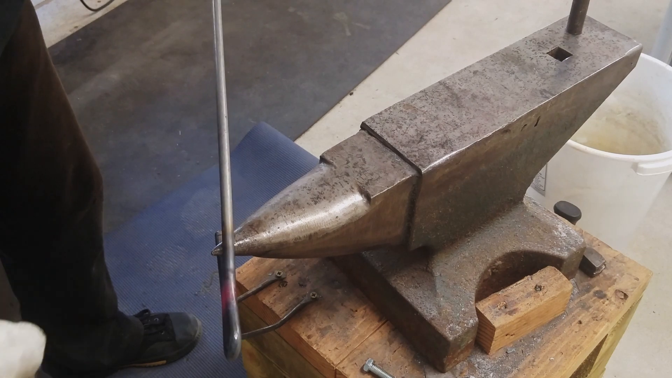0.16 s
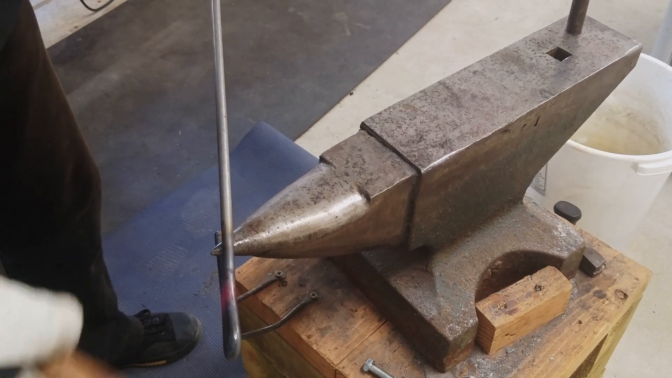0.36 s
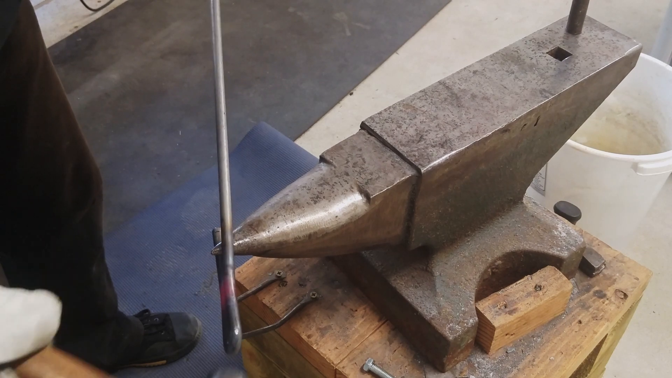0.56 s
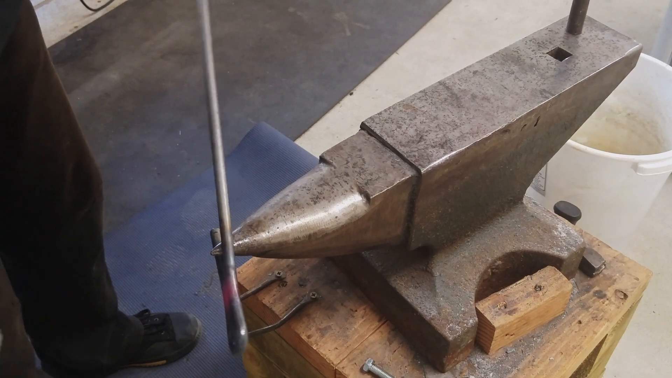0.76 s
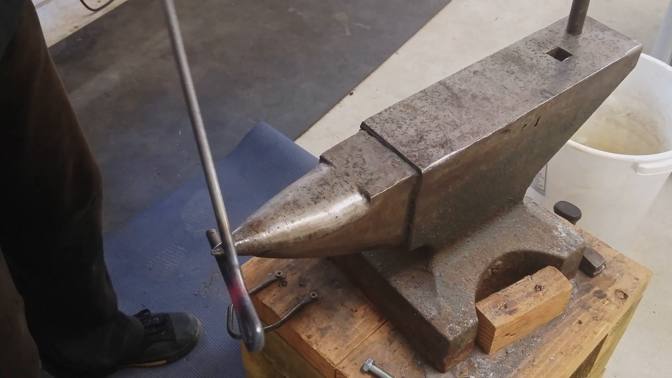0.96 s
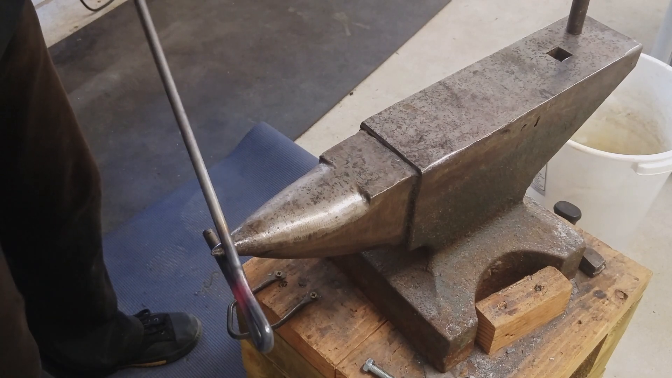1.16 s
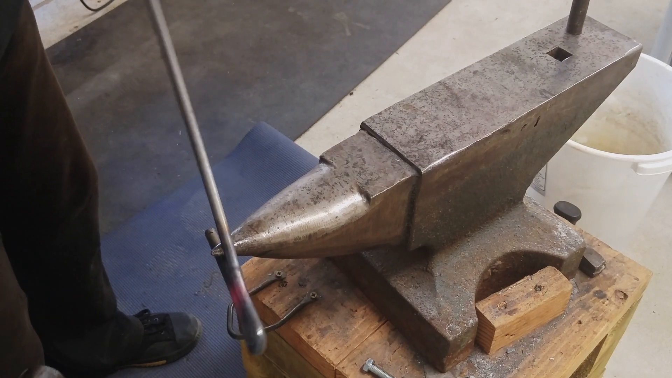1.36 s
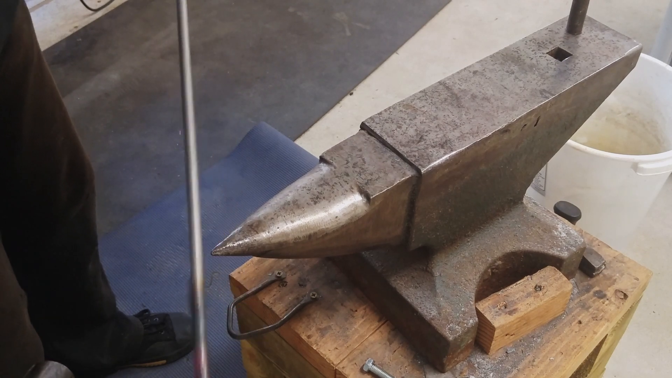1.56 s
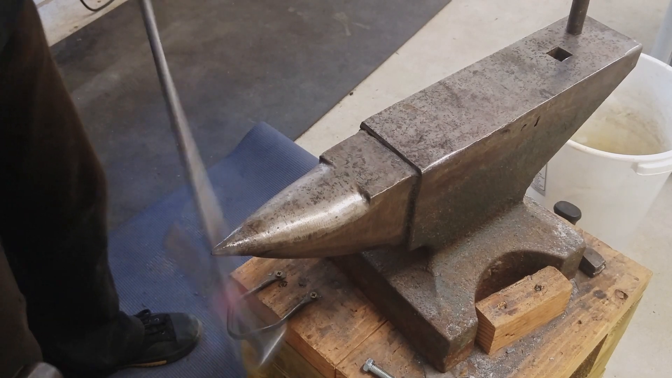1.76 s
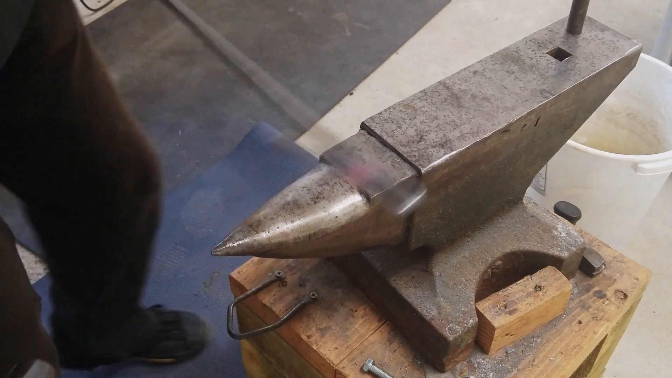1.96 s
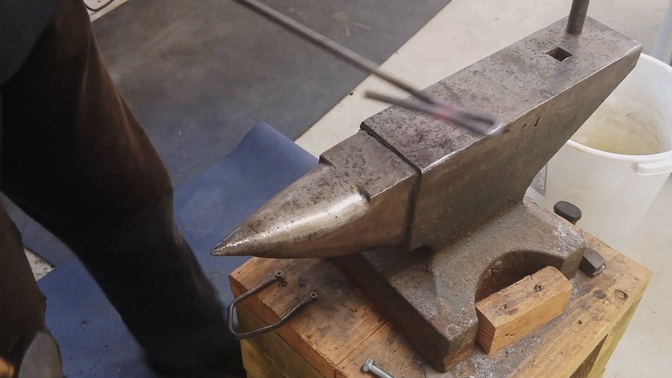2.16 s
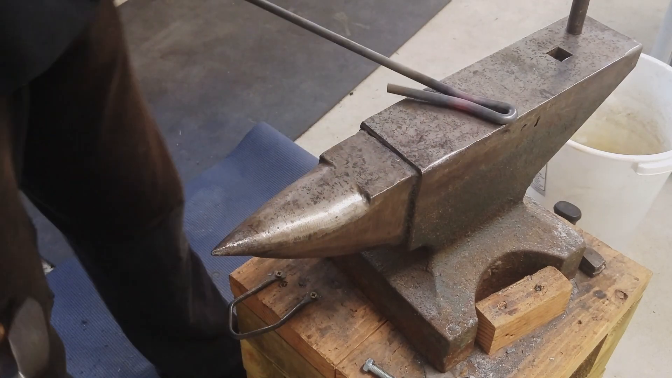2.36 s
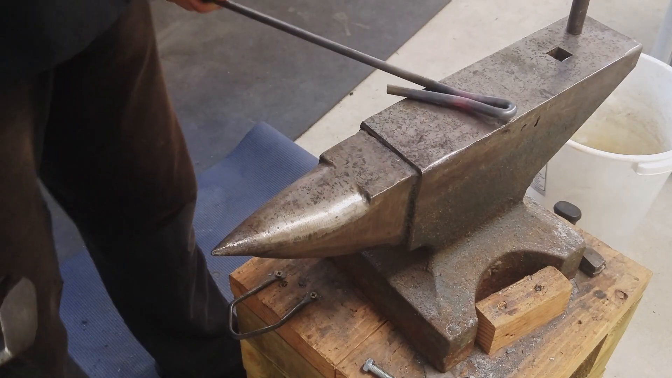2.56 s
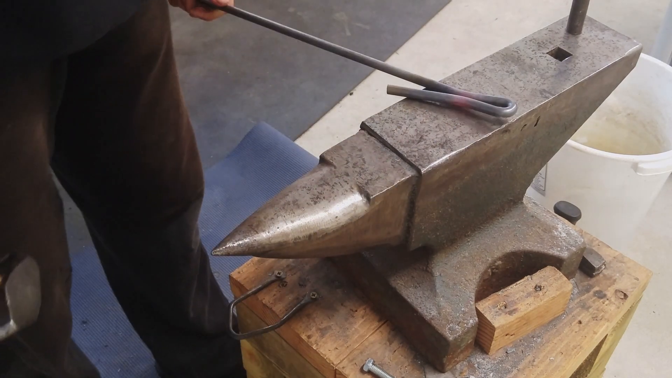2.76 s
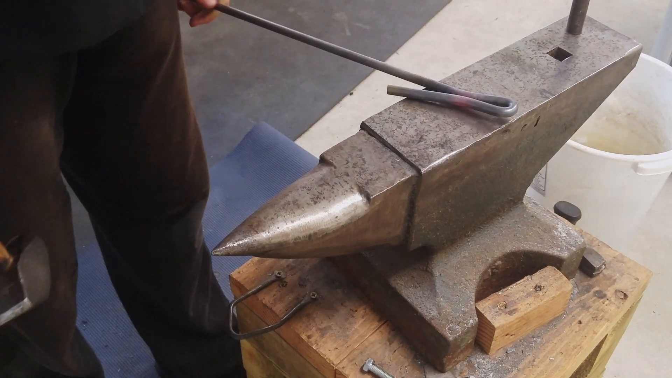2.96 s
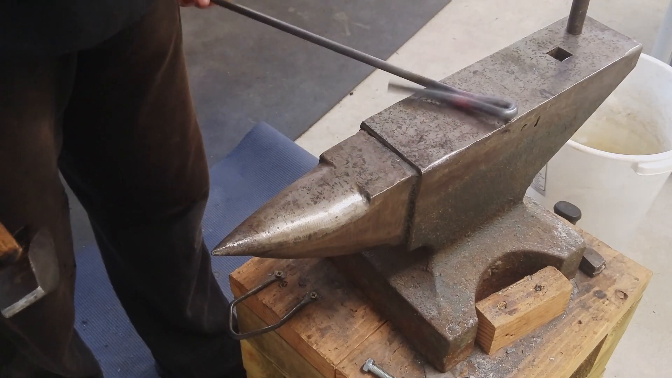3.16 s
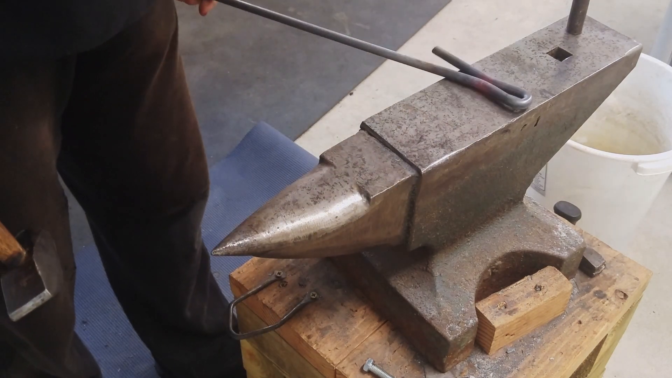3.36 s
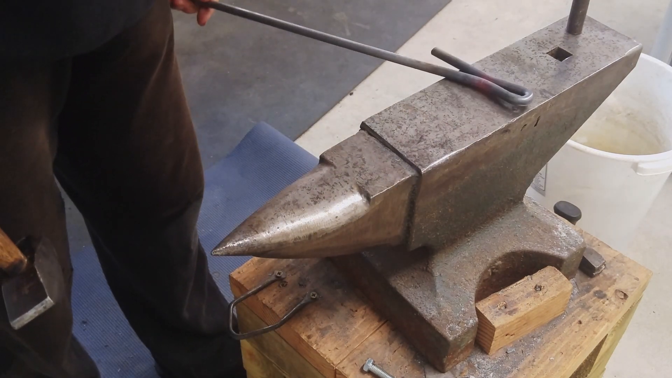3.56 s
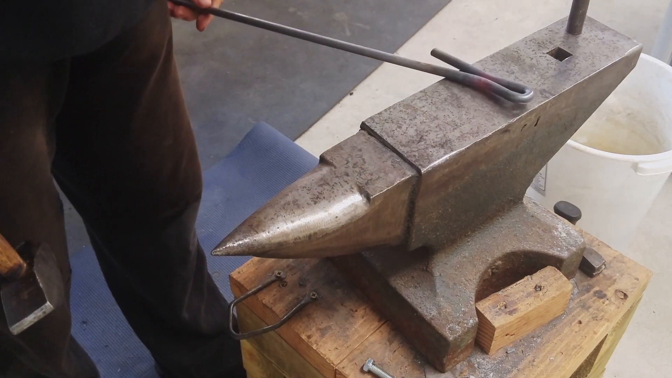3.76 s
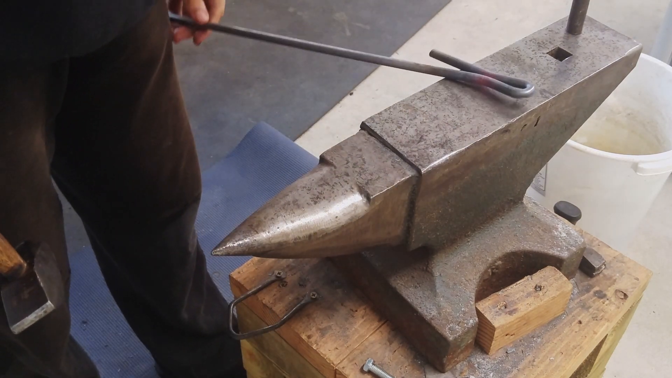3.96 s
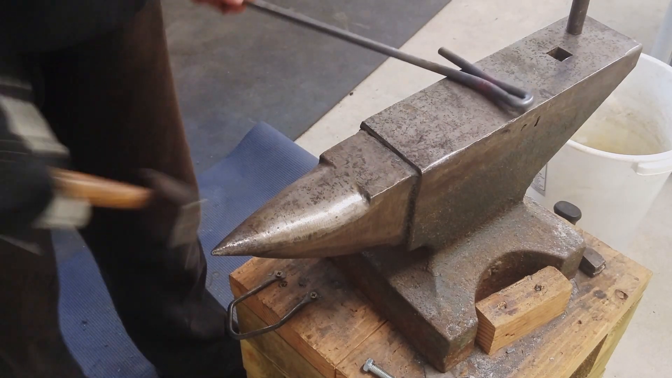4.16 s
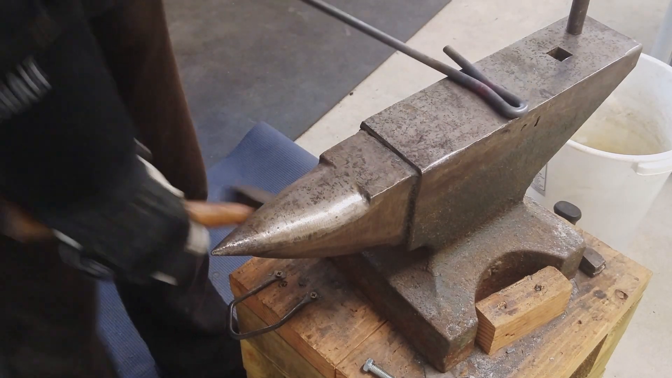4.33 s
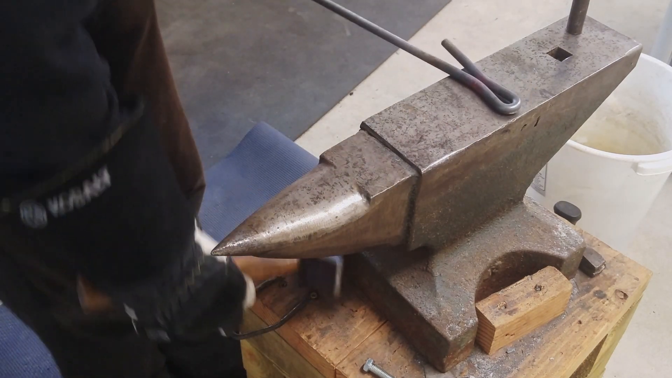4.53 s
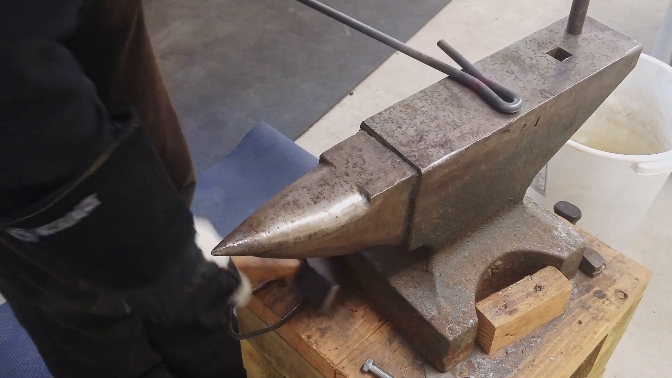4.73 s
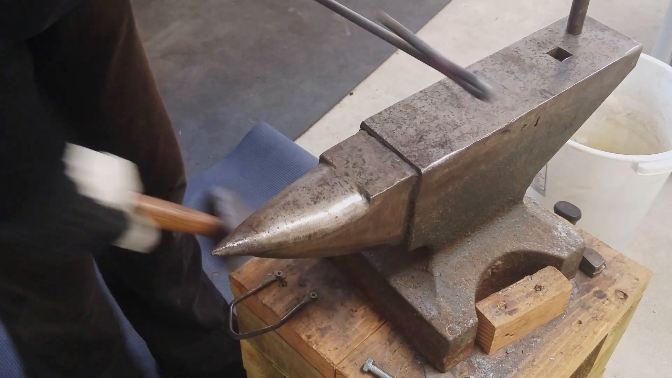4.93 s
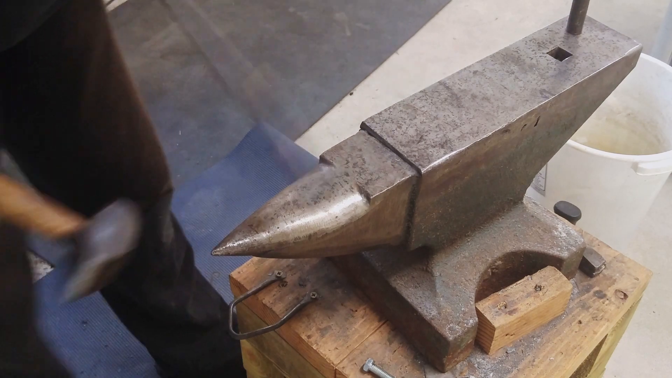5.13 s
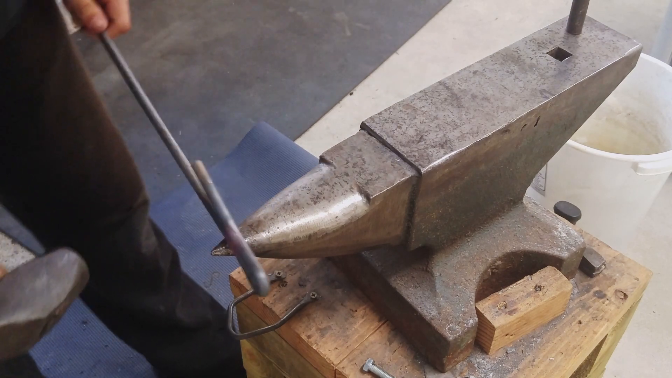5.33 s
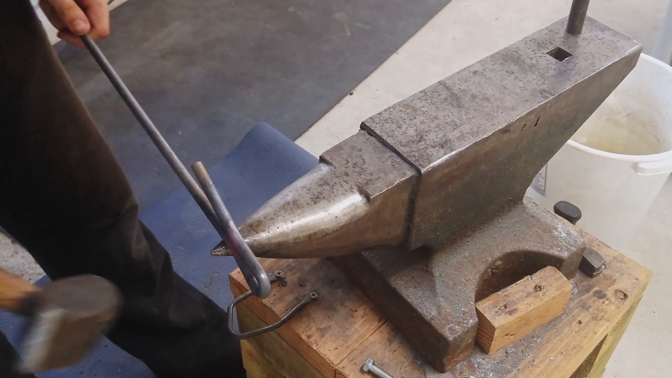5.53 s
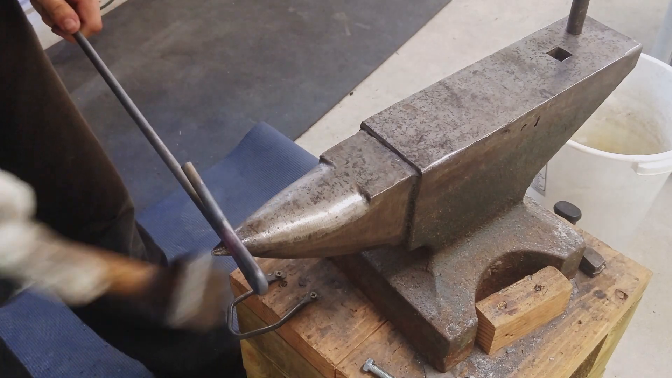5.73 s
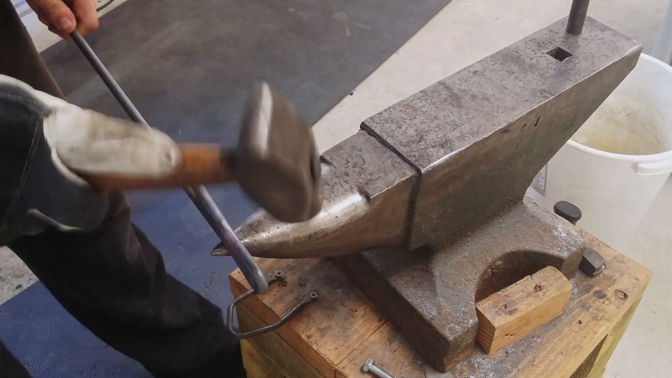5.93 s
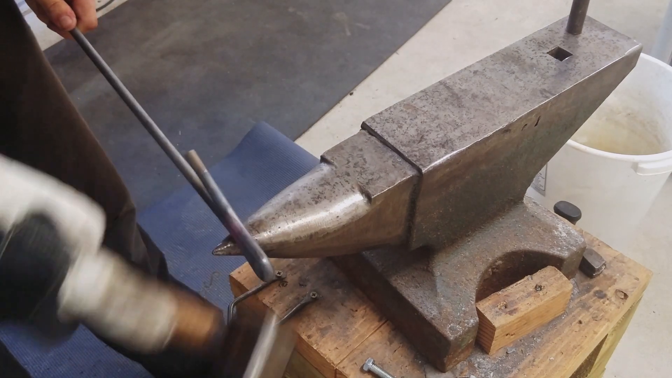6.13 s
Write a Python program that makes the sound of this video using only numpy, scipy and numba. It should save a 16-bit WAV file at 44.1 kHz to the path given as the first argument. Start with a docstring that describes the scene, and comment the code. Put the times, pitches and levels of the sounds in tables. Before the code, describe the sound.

A smith strikes, drags and drops a steel rod on a ringing anvil, with dry wooden knocks, a faint distant hiss and room echo.

```python
"""The ring of a blow struck just before the start, then more hammering as a smith bends a steel rod on an anvil.
Blows and landings are struck modes with close, beating twins, plus noise bursts for the clash of contact.
The rod drags over the horn by stick and slip, drops and bounces; steel knocks on the wooden stand.
Clothes and shoes brush, a hiss swells with a climbing whistle, ventilation and a machine hum lie behind.
A hard-walled workshop reverberates; the close microphone ducks at each blow, so the room swells up behind it."""
import sys
import numpy as np
from scipy import signal
from scipy.fft import rfft, irfft, next_fast_len
from scipy.io import wavfile
from scipy.ndimage import uniform_filter1d, minimum_filter1d
from numba import njit

SR = 44100
rng = np.random.default_rng(int(sys.argv[2]) if len(sys.argv) > 2 else 0)


def wav_out(sig):
    """Save sig, one row per channel (or a flat mono array), as 16-bit PCM at SR to the path in sys.argv[1]."""
    wavfile.write(sys.argv[1], SR, np.round(np.clip(np.atleast_2d(sig).T, -1, 1) * 32767).astype(np.int16))


N = 272968
# synthesis starts a quarter second early, so that earlier sounds are already ringing at time 0
LEAD = SR // 4
TIME = (np.arange(N + LEAD) - LEAD) / SR
AGE = np.arange(SR) / SR  # time since a hit [s]


def from_db(db):
    """Logarithmic level: decibels to amplitude gain."""
    return 10 ** (np.asarray(db) / 20)


def unit(x):
    """Mean power: scale to rms 1."""
    return x / np.sqrt(np.mean(x ** 2))


def burst(x):
    """Total energy: scale a hit to the energy of 10 ms at rms 1."""
    return x / np.sqrt(np.sum(x ** 2) / (SR / 100))


def fade(t, t60):
    """Exponential damping: 60 dB down at t60."""
    return np.exp(-np.log(1000) * t / t60)


def swell(start_s, attack_s, hold_s, release_t60, db):
    """Amplitude envelope: gain that rises evenly, holds and dies away."""
    age = TIME - start_s
    release = fade(np.maximum(age - attack_s - hold_s, 0), release_t60)
    return from_db(db) * np.clip(age / attack_s, 0, 1) * release


def colour(x, spectrum):
    """Minimum-phase filtering: shape by (frequency [Hz], relative level [dB]) points, without pre-ringing."""
    hz, db = np.transpose(spectrum)
    size = 2 * next_fast_len(len(x))
    f = np.maximum(np.fft.rfftfreq(size, 1 / SR), 1)
    cepstrum = irfft(np.log(from_db(np.interp(np.log(f), np.log(hz), db))))
    # keeping only the causal half of the cepstrum gives the minimum phase
    response = np.exp(2 * rfft(cepstrum[:size // 2], size))
    return irfft(rfft(x, size) * response)[:len(x)]


def noise(spectrum):
    """Stationary random signal: coloured noise at rms 1."""
    return unit(colour(rng.standard_normal(len(TIME)), spectrum))


def resonate(x, hz, width):
    """Simple resonator: one peak of the given width [Hz], gain 1 at its centre."""
    return signal.lfilter(*signal.iirpeak(hz, hz / width, fs=SR), x)


def ring(hz, db, t60, tilt_db=0, split=0.00463, twin_db=-5):
    """Modal synthesis: harder contact is brighter; uneven steel gives each mode a close twin that beats with it."""
    t = AGE[:SR // 2]
    chance = rng.uniform(-1, 1, (len(hz), 2))
    gain = from_db(db + tilt_db * np.log2(hz / 4000)) * np.sign(chance[:, 0])  # random polarity
    phase = (2 * np.pi * np.outer(hz, t)).astype(np.float32)
    # the twin lies above or below by 0.5 to 1.5 times the split
    gap = split * (chance[:, 1:] + .5 * np.sign(chance[:, 1:]))
    twin = np.sin(phase * (1 + gap).astype(np.float32))
    pair = np.sin(phase) + from_db(twin_db) * twin
    modes = gain @ (pair * fade(t, t60[:, None]))
    return np.pad(burst(modes), (0, SR - len(t)))


def crash(spectrum, t60, tilt_db=0, snap=0.22):
    """High modal density: a snap at first contact, then countless short modes heard as a dying noise burst."""
    rattle = rng.standard_normal(SR) * fade(AGE, t60)
    rattle[0] = snap * np.sqrt(np.sum(rattle ** 2))
    tilted = [(hz, db + tilt_db * np.log2(hz / 4000)) for hz, db in spectrum]
    return burst(colour(rattle, tilted))


def add(track, s, sound):
    """Superposition: mix a sound in at time s."""
    start = max(int(s * SR) + LEAD, 0)
    part = sound[:max(len(track) - start, 0)]
    track[start:start + len(part)] += part


# anvil modes: (frequency [Hz], relative level [dB], t60 [s])
ANVIL_MODES = [(1100, -16.0, 0.24), (1445, -6.0, 0.24), (1950, -13.0, 0.24), (2169, -1.0, 0.24),
               (2384, -10.0, 0.24), (2573, -8.0, 0.24), (3187, -2.0, 0.24), (4064, -3.0, 0.36),
               (4447, -5.0, 0.24), (4503, -4.0, 0.36), (5000, 0.0, 0.36), (5264, -6.0, 0.24),
               (5545, -15.0, 0.24), (6223, -4.0, 0.24), (6880, -14.0, 0.24), (7601, -9.0, 0.24),
               (8605, -19.0, 0.2), (9436, -31.0, 0.2), (9813, -32.0, 0.2), (10160, -31.0, 0.2),
               (11550, -35.0, 0.2), (13070, -40.0, 0.2), (14292, -38.0, 0.2)]
# spectrum of the clash of steel on steel: (frequency [Hz], relative level [dB])
CLASH_SPECTRUM = [(250, -27.5), (500, -26.5), (1000, -9.5), (1800, -10.5), (2100, -6), (2900, -9.5),
                  (3600, -8.5), (5200, -4), (6400, -11), (8000, -24), (11000, -30.5), (15500, -39)]
# modes of hammer, rod and horn pressed together:
# (frequency [Hz], relative level struck at the bend [dB], relative level struck along the leg [dB], t60 [s])
HAMMER_MODES = [(936, -27, -22, 0.2), (1352, -37, -11.5, 0.13), (1962, -31.5, -10.5, 0.42),
                (2068, 9, -11, 0.076), (2170, -11, -15, 0.028), (2539, -9, 2.5, 0.12),
                (3527, -22.5, -20, 0.33), (3990, -5, -10, 0.16), (4500, -15, -22, 0.15),
                (5045, 2, -15, 0.11), (5400, -11.5, -35, 0.089), (5170, -15, -26.5, 0.14),
                (5740, -19, -21, 0.14), (6150, -21.5, -18.5, 0.047), (6300, -24.5, 0, 0.085),
                (6150, -0.5, -37, 0.123), (7320, -26, -4.5, 0.068), (8720, -47, -16, 0.124),
                (8800, -35.5, -37.5, 0.14), (10100, -20.5, -22.5, 0.12), (12000, -47, -15.5, 0.088)]
# hammer blows: (time [s], hammer level [dB], anvil level [dB], clash level [dB], jolt of the stand [dB],
# place from bend to leg [0-1], tilt [dB per octave])
HAMMER_BLOWS = [(-.08, -2, -12.5, -1.5, -31, 0.1, 3), (0.474, -3.5, -20, -5, -27, 0.34, 0.9),
                (6.0945, -1, -8, -2, -11, 0.97, 0.5)]


def hammer_blows():
    """Impact excitation: the hammer drives the rod onto the horn, with a clash, and both masses ring."""
    out = np.zeros(len(TIME))
    hz, bend_db, leg_db, t60 = np.transpose(HAMMER_MODES)
    for s, hammer_db, anvil_db, clash_db, _, along, tilt_db in HAMMER_BLOWS:
        mode_db = bend_db + np.clip(along, 0, 1) * (leg_db - bend_db)
        hammer = ring(hz, mode_db, t60, tilt_db)
        anvil = ring(*np.transpose(ANVIL_MODES), tilt_db)
        clash = crash(CLASH_SPECTRUM, t60=.06, tilt_db=tilt_db, snap=.1)
        clash = clash + from_db(-10) * crash(CLASH_SPECTRUM, t60=.01, tilt_db=4, snap=.1)  # sharp edge
        add(out, s, from_db(hammer_db) * hammer + from_db(anvil_db) * anvil + from_db(clash_db) * clash)
    return out


REBOUND = .71  # each flight as a share of the one before


def bounces(s, flight_s, loss_db, count=4):
    """Inelastic rebound: contacts (number, time, gain) with ever shorter flights, ever weaker."""
    for k in range(count):
        if k * loss_db < 18:  # weaker contacts are left out
            yield k, s, from_db(-k * loss_db)
        s = s + flight_s * REBOUND ** k


# modes of the bent rod against the anvil:
# (frequency [Hz], relative level landing flat [dB], relative level landing on edge [dB], t60 [s])
ROD_MODES = [(1193, -37, -32, 0.11), (1690, -37.5, -6, 0.08), (2400, -19, 8.5, 0.039),
             (2558, -25.5, -9.5, 0.71), (3040, -10, -14, 0.091), (3190, 1, -20, 0.031),
             (3500, -6, -38, 0.1), (4016, 1, -5, 0.19), (4080, -13, -12, 0.11), (4440, -2.5, -10, 0.051),
             (4345, -23.5, 2, 0.31), (4950, -12, -17, 0.11), (5084, -7.5, 2, 0.25), (5200, -18, -0.5, 0.12),
             (6180, -17, 11, 0.08), (6245, -8, -3.5, 0.11), (6810, -18, 6, 0.064),
             (7360, -19.5, 9.5, 0.025), (7330, -16, -16, 0.085), (7880, -55, -15, 0.49),
             (8700, -26.5, -10, 0.096), (9480, -55, -33, 0.052), (10270, -29.5, -7.5, 0.05),
             (11600, -30, -9.5, 0.064), (12630, -44, -20, 0.15), (13110, -57, -35, 0.15),
             (13790, -59.5, -12, 0.15), (16500, -65, -45, 0.15)]
# the rod drops on the anvil: (time [s], rod level [dB], anvil level [dB], clash level [dB],
# flat to on edge [0-1], tilt [dB per octave], first flight [s], loss per bounce [dB])
ROD_LANDINGS = [(2.341, -13.5, -57, -23, 0.09, 5.5, .0347, 5), (2.473, -30, -37.5, -47, 0.36, 0.5, .012, 6),
                (3.2582, -22, -28.5, -26.5, 0.42, 6, 0.008, 4.5),
                (3.3859, -17.5, -23, -18, 0.74, 4.5, .0105, 1.1),
                (4.401, -41.5, -54, -64, 0.34, -7, 0.014, 20),
                (5.3419, -18.5, -8.5, -11.5, 0.9, 1.17, 0.041, 6.5)]
# with each bounce the contacts grow duller [dB per octave] and clash less [dB]
BOUNCE_TILT_DB, BOUNCE_CLASH_DB = -2, -7.5


def rod_landings():
    """Position-dependent excitation: the rod rings the anvil and bounces; the side it lands on picks its modes."""
    out = np.zeros(len(TIME))
    hz, flat_db, edge_db, t60 = np.transpose(ROD_MODES)
    for s, rod_db, anvil_db, clash_db, edge, tilt_db, flight_s, loss_db in ROD_LANDINGS:
        add(out, s, from_db(anvil_db) * ring(*np.transpose(ANVIL_MODES), tilt_db))
        mode_db = flat_db + np.clip(edge, 0, 1) * (edge_db - flat_db)
        for k, contact_s, gain in bounces(s, flight_s, loss_db):
            bright_db = tilt_db + k * BOUNCE_TILT_DB
            rod = ring(hz, mode_db, t60, bright_db)
            clash = crash(CLASH_SPECTRUM, t60=0.043, tilt_db=bright_db, snap=0.91)
            clash_gain = from_db(clash_db + k * BOUNCE_CLASH_DB)
            add(out, contact_s, gain * (from_db(rod_db) * rod + clash_gain * clash))
    return out


# modes of the horn under the dragging rod: (frequency [Hz], relative level [dB], t60 [s])
HORN_MODES = [(1476, 1.5, 0.22), (1690, -22, .06), (1900, 3, 0.047), (2164, 2, 0.45), (2570, -2.5, 0.16),
              (4090, -0.5, 0.18), (4520, -4, 0.19), (5050, -2, 0.22), (6250, -9.5, 0.32), (7560, -16, 0.12)]
# the drag bites quickly, holds and slips off
DRAG_AT_S, DRAG_ATTACK_S, DRAG_HOLD_S, DRAG_T60_S, DRAG_DB = 1.497, 0.017, 0.031, .15, -38


def rod_drag(slips_per_s=1200):
    """Stick-slip friction: scale on the rod catches and slips, and the tiny kicks ring the horn."""
    slips = (rng.random(len(TIME)) < slips_per_s / SR) * rng.standard_normal(len(TIME))
    horn = ring(*np.transpose(HORN_MODES)) + from_db(-10.0) * crash(CLASH_SPECTRUM, t60=0.015, tilt_db=-4)
    scrape = unit(signal.fftconvolve(slips, horn)[:len(TIME)])
    return scrape * swell(DRAG_AT_S, DRAG_ATTACK_S, DRAG_HOLD_S, DRAG_T60_S, DRAG_DB)


# spectra of the stand's clack and thud: (frequency [Hz], relative level [dB])
CLACK_SPECTRUM = [(150, -28), (400, -10), (600, 5), (850, 6), (1400, -2.5), (2000, -6.5), (2900, -13),
                  (4500, -22), (6000, -32.5), (8500, -61), (15500, -57)]
THUD_SPECTRUM = [(25, -42), (60, -9), (130, -12.5), (200, -1), (300, -7.5), (420, -6.5), (700, -10),
                 (1500, -62)]
# modes of the stand rocking on the floor: (frequency [Hz], relative level [dB], t60 [s])
STAND_MODES = [(66, -8, .2), (122, -7, .15), (204, 0, .15), (353, -3, .12)]


def stand(clack_db, thud_db, tilt_db, rock_db):
    """Heavily damped body: a dry clack over the thud of the rocking block, bursts brighter for harder contact."""
    clack = crash(CLACK_SPECTRUM, t60=0.044, tilt_db=tilt_db, snap=0.37)
    thud = crash(THUD_SPECTRUM, t60=0.27, tilt_db=tilt_db, snap=0.46)
    thud = thud + from_db(rock_db) * ring(*np.transpose(STAND_MODES), twin_db=-7)
    return from_db(clack_db) * clack + from_db(thud_db) * thud


# modes of steel ringing briefly on the stand: (frequency [Hz], relative level [dB], t60 [s])
HEAD_MODES = [(659, -20.5, 0.14), (1433, -6.5, 0.19), (2114, -40.5, 0.32), (2290, -37, 0.091),
              (3500, -34.5, 0.18)]
# steel knocks on the wooden stand: (time [s], clack level [dB], thud level [dB], steel ring level [dB],
# tilt [dB per octave], first flight [s], loss per bounce [dB])
STAND_KNOCKS = [(2.321, -47.5, -67, -65, -1, .01, 27), (4.5232, -24, -40.5, -12, 4.5, .01, 28),
                (4.595, -22.5, -20.5, -28, 0.5, .026, 3.5), (4.8206, -9, -22.5, -47, 2.5, .02, 18),
                (6.128, -14, -9.5, -50, -1.5, .009, 10)]


def stand_knocks(free_s=0.029, muted_t60=0.024):
    """Contact damping: steel bounces on the wooden stand and rings until it settles."""
    out = np.zeros(len(TIME))
    settle = fade(np.maximum(AGE - free_s, 0), muted_t60)
    head = burst(ring(*np.transpose(HEAD_MODES), twin_db=-28.0) * settle)
    for s, clack_db, thud_db, head_db, tilt_db, flight_s, loss_db in STAND_KNOCKS:
        for _, contact_s, gain in bounces(s, flight_s, loss_db):
            wood = stand(clack_db, thud_db, tilt_db, rock_db=-4.5)
            add(out, contact_s, gain * (wood + from_db(head_db) * head))
    return out


# a landing's thud against the anvil's ring, and any jolt's clack against its thud
JOLT_DB, JOLT_CLACK_DB = -22.5, -7.5


def stand_jolts():
    """Structure-borne transmission: hits pass down into the stand; the rod's follow its anvil level."""
    out = np.zeros(len(TIME))
    jolt = stand(JOLT_CLACK_DB, thud_db=0, tilt_db=0, rock_db=-8.5)
    for s, _, _, _, jolt_db, *_ in HAMMER_BLOWS:
        add(out, s, from_db(jolt_db) * jolt)
    for s, _, anvil_db, *_ in ROD_LANDINGS:
        add(out, s, from_db(anvil_db + JOLT_DB) * jolt)
    return out


# clothes and shoes brush: (time [s], Gaussian half length [s], level [dB], centre frequency [Hz])
BRUSH_SWELLS = [(2.294, 0.01, -50.5, 1300), (2.297, 0.011, -54, 4300), (2.849, 0.081, -56, 885),
                (2.856, 0.071, -58, 4180), (4.155, 0.007, -52.5, 1066), (4.796, 0.014, -42, 2800),
                (5.139, 0.073, -51.5, 4000)]
BRUSH_WIDTH = 0.68  # narrowest resonance as a share of the centre frequency


def brushes():
    """Granular friction noise: cloth and soles rub in soft, grainy swells as the smith moves."""
    out = np.zeros(len(TIME))
    for s, half, db, hz in BRUSH_SWELLS:
        width = BRUSH_WIDTH * hz
        # every 100 samples the noise takes a new random level
        grain_db = 2 * np.repeat(rng.standard_normal(SR // 100), 100)
        rub = rng.standard_normal(SR) * from_db(grain_db)
        for band in (width, width * 2, width * 2):
            rub = resonate(rub, hz, band)
        add(out, s - .5, from_db(db) * unit(rub) * np.exp(-.5 * ((AGE - .5) / half) ** 2))
    return out


# spectrum of the hiss: (frequency [Hz], relative level [dB])
HISS_SPECTRUM = [(300, -15.5), (700, -11), (1600, -8), (3000, -6), (4100, -2.5), (5200, -3), (6400, -8),
                 (7500, -19), (9000, -30.5), (15500, -35)]
# the hiss swells slowly and fades
HISS_AT_S, HISS_ATTACK_S, HISS_HOLD_S, HISS_T60_S, HISS_DB = 4.09, 0.36, 0.17, 2.2, -47
# the faint whistle inside it; its pitch climbs quickly, then levels off
WHISTLE_AT_S, WHISTLE_ATTACK_S, WHISTLE_HOLD_S, WHISTLE_T60_S, WHISTLE_DB = 4.15, .16, .1, 1.6, -73
WHISTLE_FROM_HZ, WHISTLE_TO_HZ, WHISTLE_GLIDE_S = 8300, 14800, .35


def hiss():
    """Broadband noise with a modulated tone: a soft, distant hiss and a thin, flickering whistle that climbs."""
    age = np.maximum(TIME - WHISTLE_AT_S, 0)
    hz = WHISTLE_TO_HZ + (WHISTLE_FROM_HZ - WHISTLE_TO_HZ) * np.exp(-age / WHISTLE_GLIDE_S)
    flicker = noise([(25, -12), (250, -44.0)])  # slow random amplitude
    whistle = flicker * np.sin(2 * np.pi * np.cumsum(hz) / SR)
    rush = noise(HISS_SPECTRUM) * swell(HISS_AT_S, HISS_ATTACK_S, HISS_HOLD_S, HISS_T60_S, HISS_DB)
    return rush + whistle * swell(WHISTLE_AT_S, WHISTLE_ATTACK_S, WHISTLE_HOLD_S, WHISTLE_T60_S, WHISTLE_DB)


# reverberation of the workshop: (frequency [Hz], t60 [s])
ROOM_T60 = [(100, 1), (300, 1.03), (1000, 1.31), (2200, 1.046), (5000, 1.024), (8000, 0.69), (14000, 0.34)]


def workshop(x, build_s=0.0055, gap_s=0.0017):
    """Diffuse reverberation: dense reflections build up after a short gap; the high treble dies first."""
    t = np.arange(2 * SR) / SR
    hz, t60 = np.transpose(ROOM_T60)
    f, frames, cells = signal.stft(rng.standard_normal(len(t)), SR, nperseg=256)
    band_t60 = np.interp(np.log(f + 1), np.log(hz), t60)
    tail = signal.istft(cells * fade(frames, band_t60[:, None]), SR)[1][:len(t)]
    tail = tail * (1 - np.exp(-np.maximum(t - gap_s, 0) / build_s))
    return signal.fftconvolve(x, tail / np.sqrt(np.sum(tail ** 2)))[:len(x)]


# spectrum of the ventilation noise: (frequency [Hz], relative level [dB])
SHOP_SPECTRUM = [(15, -75.5), (25, -21), (86, -9), (144, -9), (240, -11), (260, -12.5), (332, -12.5),
                 (511, -24.5), (706, -15.5), (1180, -21.5), (1960, -25), (4530, -28.5), (5040, -24.5),
                 (6430, -37), (15600, -43.5)]
SHOP_DB = -56.5
# wavering machine hum: (frequency [Hz], relative level [dB])
HUM_BANDS = [(86, -5.5), (237, -4)]
HUM_WIDTH_HZ, HUM_DB = 5.3, -64.5
# the hum grows over its steady level for a while
HUM_AT_S, HUM_ATTACK_S, HUM_HOLD_S, HUM_T60_S, HUM_SWELL_DB = .9, 1.08, 1.43, 2.8, -64


def background():
    """Narrow-band noise over broadband noise: a machine's hum wavers in the ventilation noise."""
    hum = np.zeros(len(TIME))
    for hz, db in HUM_BANDS:
        band = resonate(rng.standard_normal(len(TIME)), hz, HUM_WIDTH_HZ)
        hum += from_db(db) * unit(resonate(band, hz, HUM_WIDTH_HZ))
    hum_gain = from_db(HUM_DB) + swell(HUM_AT_S, HUM_ATTACK_S, HUM_HOLD_S, HUM_T60_S, HUM_SWELL_DB)
    return from_db(SHOP_DB) * noise(SHOP_SPECTRUM) + hum * hum_gain


def scene():
    """Direct and reverberant sound: all sources, the near ones each with their own share of the room."""
    blows = hammer_blows()
    rod = rod_landings()
    knocks = stand_knocks() + stand_jolts()
    rubs = rod_drag() + brushes()
    sent = from_db(-7.0) * blows + from_db(-10.5) * rod + from_db(-9.0) * knocks + from_db(-15) * rubs
    return (blows + rod + knocks + rubs + workshop(sent) + hiss() + background())[None, LEAD:]


@njit
def follow(x, attack, release, start):
    """Envelope detection: rise and fall at separate speeds."""
    out, e = np.empty(len(x)), start
    for i in range(len(x)):
        e += (x[i] - e) * (attack if x[i] > e else release)
        out[i] = e
    return out


def compress(x, top_db, attack_s, release_s, ratio, size=45):
    """Dynamic range compression: turn the gain down smoothly while the envelope is over the top level."""
    swing = np.abs(x)
    start = 2 * swing[:SR // 100].mean()
    envelope = follow(swing, 1 / (1 + attack_s * SR), 1 / (1 + release_s * SR), start)
    gain = np.minimum(from_db(top_db) / envelope, 1) ** (1 - 1 / ratio)
    # the window of size samples is centred, so the gain falls slightly ahead of a peak
    return x * uniform_filter1d(minimum_filter1d(gain, size), size)


def record(dry, notch_hz=490, notch_width_hz=190):
    """Band limiting and gain control: a microphone without deep bass, hollow in the low mids, ducking at blows."""
    x = dry[0] - 0.77 * resonate(dry[0], notch_hz, notch_width_hz)
    x = signal.sosfilt(signal.butter(2, 40, "high", fs=SR, output="sos"), x)
    x = compress(x, top_db=-16.5, attack_s=0.011, release_s=0.17, ratio=2.14)  # slow gain control
    x = compress(x, top_db=-4.0, attack_s=0.00023, release_s=0.036, ratio=1.3)  # fast, gentle
    x = compress(x, top_db=-4, attack_s=0, release_s=.002, ratio=50)  # limiter
    return signal.sosfilt(signal.ellip(8, .2, 70, 15600, fs=SR, output="sos"), x)[None]


dry = scene()
out = record(dry)
wav_out(out)
```